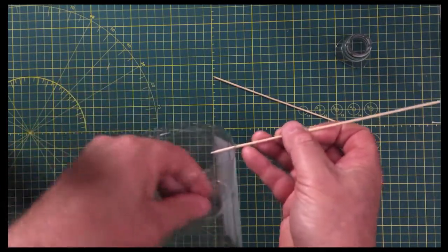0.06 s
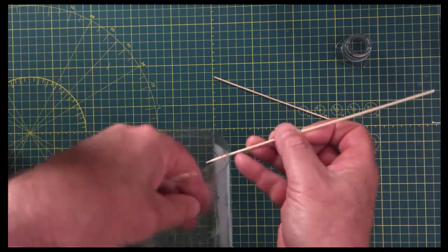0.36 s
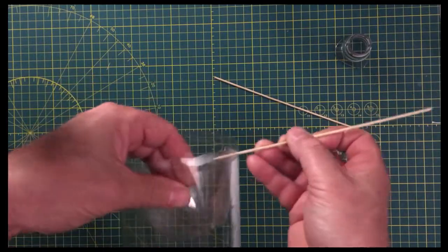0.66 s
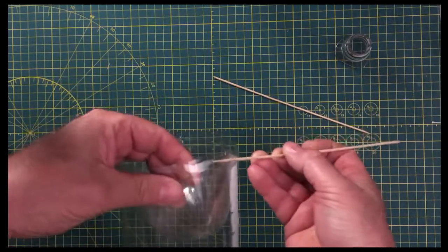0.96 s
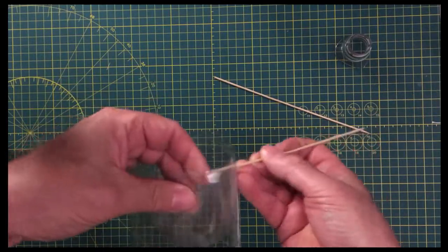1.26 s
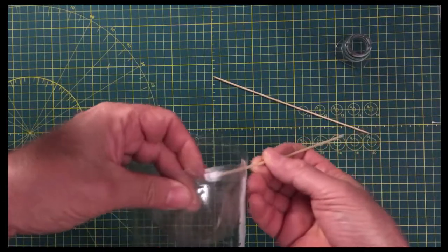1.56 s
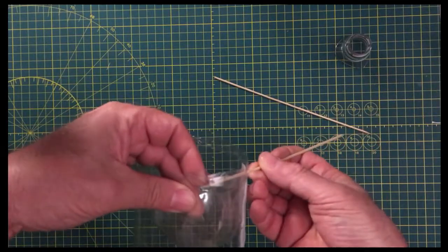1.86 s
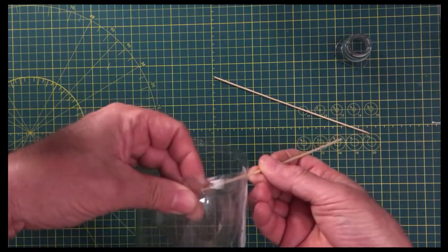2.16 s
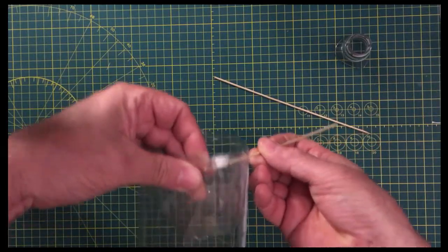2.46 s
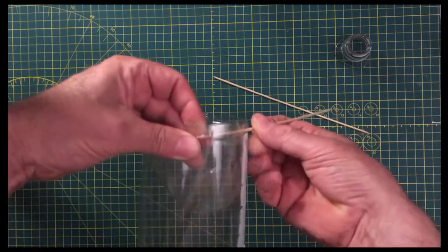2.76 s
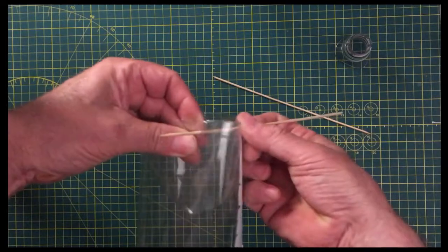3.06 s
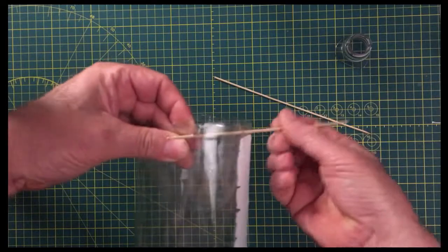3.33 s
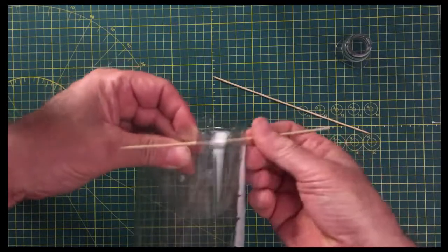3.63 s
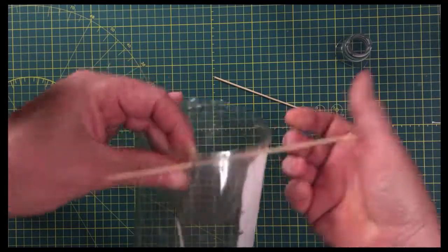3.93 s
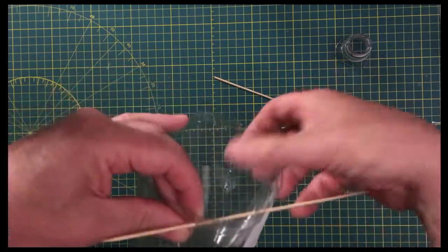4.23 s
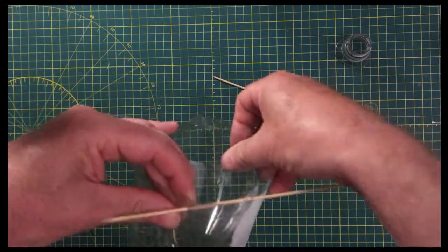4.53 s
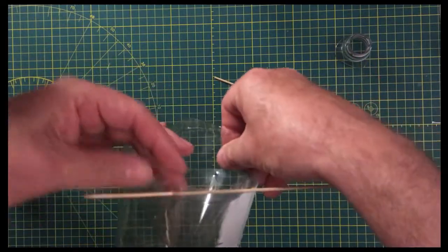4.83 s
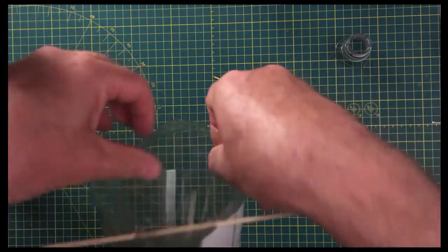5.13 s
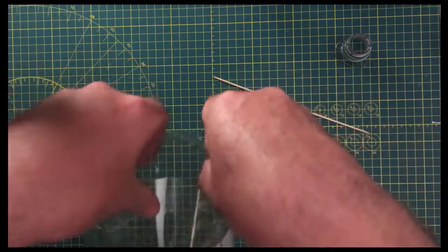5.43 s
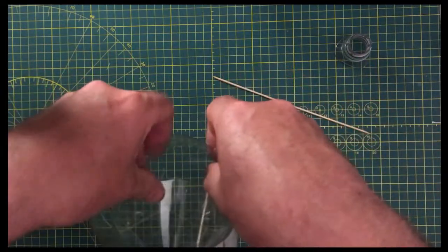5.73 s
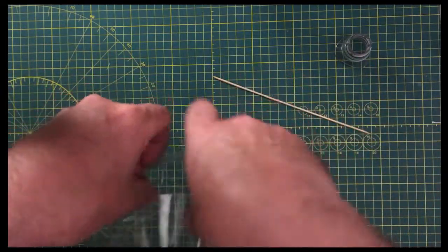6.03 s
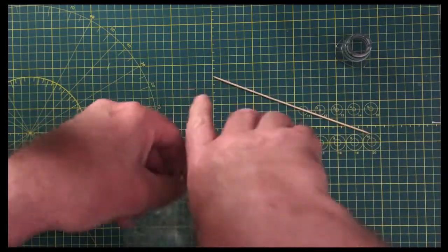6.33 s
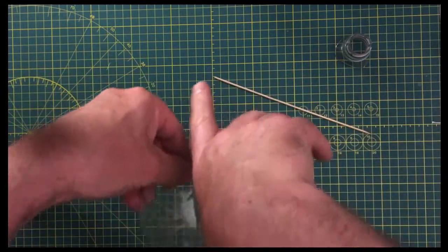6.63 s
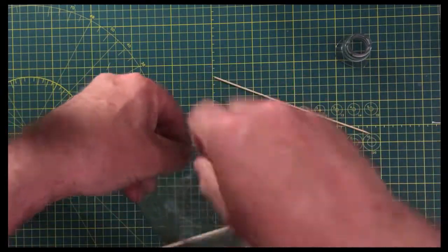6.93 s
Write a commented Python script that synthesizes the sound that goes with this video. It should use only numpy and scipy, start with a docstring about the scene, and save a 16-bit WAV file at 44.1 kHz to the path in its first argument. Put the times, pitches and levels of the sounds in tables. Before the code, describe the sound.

Wood ticks, rasps and squeaks in short turns against a thin plastic bottle until the wall gives way with a sharp snap, the loudest sound. A quick squeaky run follows as the stick slides through. Then come scattered plastic pops, short drags of the rim on the table and soft thuds of hands. Each touch rings hollow inside the bottle, heard from close by in a quiet small room.

```python
"""Skewer through a plastic bottle

Close up, a wooden skewer is twisted through a thin plastic bottle, then pushed on through it.
The wood rubs, ticks and squeaks in the tight hole, the far wall gives way with a loud snap, and the
shell pops under the fingers. The bottle's rim drags over a cutting mat; the air inside rings on
after every touch, and a small room answers."""
import sys
import numpy as np
from scipy import signal
from scipy.fft import rfft, irfft, next_fast_len
from scipy.io import wavfile
from scipy.ndimage import uniform_filter1d, map_coordinates

SR = 44100
rng = np.random.default_rng(int(sys.argv[2]) if len(sys.argv) > 2 else 0)


def transcribe(signal):
    """Save signal, clipped to [-1, 1], as a 16-bit WAV file at the path in sys.argv[1]."""
    frames = np.atleast_2d(signal).T
    limited = np.clip(frames, -1, 1)
    pcm = np.round(limited * 32767).astype(np.int16)
    wavfile.write(sys.argv[1], SR, pcm)


N = 308259

# Resonances, all as (pitch [Hz], width [Hz], level [dB])
WOOD_MODES = [(2160, 300, 2), (2630, 180, -3), (3430, 220, 0), (3804, 320, 3), (4430, 610, -1),
              (5740, 400, -12.5), (7060, 750, 0.5), (7580, 540, -6.5), (11240, 990, -7),
              (12900, 1700, -17.5)]  # the skewer's bright ring
WALL_MODES = [(693, 136, -13.5), (832, 150, -5.5), (1089, 78, 0.5), (1174, 51, -2), (1316, 120, -12)]  # the midrange honk of the bottle's wall
CAVITY_MODES = [(117, 130, -14), (259, 66.4, -4.5), (333.5, 34.8, 4), (430, 60, -13.5), (485, 160, -17.5),
                (622, 380, -14)]  # the hollow hum inside
SHELL_MODES = [(853, 38, -4.5), (1083, 237, 4), (2070, 270, -1.5), (2463, 290, -0.5), (3305, 840, -4.5),
               (4070, 410, -2), (4690, 610, -5.5), (5940, 700, -4.5), (7050, 1300, -5), (8600, 1900, -7),
               (11400, 3700, -14)]  # the crisp crackle of thin plastic


def amp(db):
    """Decibels to gain."""
    return 10 ** (np.asarray(db) / 20)


def unit(x):
    """Scale to rms 1."""
    return x / np.sqrt(np.mean(x ** 2) + 1e-20)


def unit_peak(x):
    """Scale a hit so that its loudest 3 ms peak at roughly 1."""
    power = np.abs(uniform_filter1d(x ** 2, size=128))
    return x / (2 * np.sqrt(power.max()))


def along(points, hz):
    """Read a curve of (frequency [Hz], value) points on a log axis."""
    f, values = np.transpose(points)
    return np.interp(np.log(hz + 1), np.log(f), values)


def add(track, s, x):
    """Mix x into track from time s."""
    start = max(round(s * SR), 0)
    part = track[start:start + len(x)]
    part += x[:len(part)]


def filtered(x, response):
    """Filter x by a complex response of frequency."""
    size = next_fast_len(len(x) + 4096)
    return irfft(rfft(x, size) * response(np.fft.rfftfreq(size, 1 / SR)), size)[:len(x)]


def ring(x, modes, vary=0, order=1):
    """Play x through resonances; vary recolours them per contact point, order 2 steepens them."""
    gains_db = 3 * vary * rng.normal(0, 1, len(modes))
    stretch = 1 + .02 * vary * rng.normal()

    def response(f):
        total = 0
        for k, (hz, width, db) in enumerate(modes):
            peak = 1j * f * width / ((hz * stretch) ** 2 - f * f + 1j * f * width)
            total += (-1) ** (k * order) * amp(db + gains_db[k]) * peak ** order
        return total
    return filtered(x, response)


def wobble(rate):
    """A smooth random curve with rate knots a second."""
    knots = rng.standard_normal(int(N * rate / SR) + 4)
    return map_coordinates(knots, [np.arange(N) * rate / SR])


def friction(rate, spread_db, rush):
    """Tiny slips of uneven size, rate a second, over a smooth rush."""
    clicks = (rng.random(N) < rate / SR) * rng.choice([-1, 1], N)
    sizes = amp(spread_db * np.clip(rng.standard_normal(N), -2, 2))
    return unit(clicks * sizes) + rush * rng.standard_normal(N)


def burst(rise_s, decay_s):
    """A short broadband shudder of force that swells and dies."""
    t = np.arange(4096) / SR
    envelope = (1 - np.exp(-(t / rise_s) ** 2)) * np.exp(-t / decay_s)
    spectrum = rfft(rng.standard_normal(len(t)) * envelope)
    return irfft(spectrum / (np.abs(spectrum) + 1e-9)) * np.sqrt(envelope)


def pressure(strokes, rise_s, fall_s):
    """Envelope of (time [s], length [s], level [dB]) strokes that bite, ease off and let go."""
    sag_db_per_s = 23.5
    power, t = np.zeros(N), np.arange(SR // 3) / SR
    bite = 1 - np.exp(-(t / rise_s) ** 2)
    for s, length, db in strokes:
        eased = amp(db - sag_db_per_s * (t - length / 2)) ** 2
        release = np.exp(-np.maximum(t - length, 0) / fall_s)
        add(power, s - rise_s / 2, eased * bite * release)
    return np.sqrt(power)


def room_tone():
    """The room's steady, dark hush."""
    # Noise colour: (frequency [Hz], level [dB])
    colour = [(15, -31.5), (25, -20), (217, -2.5), (463, -5), (575, -12.5), (754, -8), (1480, -15.5),
              (1610, -15), (4490, -31), (4870, -38.5), (16000, -56.5)]
    return unit(filtered(rng.standard_normal(N), lambda f: amp(along(colour, f))))


def room_reverb(x, build_s=.0018, sections=24):
    """A small room's short tail, longest in the lows, drawn afresh for each equal section."""
    # Reverb time: (frequency [Hz], time to fall 60 dB [s])
    decay_times = [(150, 0.37), (400, 0.44), (1000, 0.28), (2800, 0.31), (7300, 0.19), (15000, 0.21)]
    out = np.zeros(N)
    for part in np.array_split(np.arange(N), sections):
        hz, t, noise = signal.stft(rng.standard_normal(SR // 2), SR, nperseg=256)
        decay = amp(-60 * t / along(decay_times, hz)[:, None])
        tail = signal.istft(noise * decay, SR, nperseg=256)[1]
        tail *= 1 - np.exp(-(np.arange(len(tail)) / SR / build_s) ** 2)
        send = x[part] * signal.windows.tukey(len(part), .02)
        add(out, part[0] / SR, signal.fftconvolve(send, tail / np.linalg.norm(tail)))
    return out


def bottle_air(touch, width_hz=24):
    """The air inside the bottle rings on after every touch."""
    # Narrow air resonances: (pitch [Hz], level [dB])
    modes = [(637, -7.5), (1053, -2), (1274, -6), (1514, 1.5), (2005, -8.5), (2396, -10.5), (2612, -5),
             (3173, -4), (3910, -7.5), (4555, -4), (7052, -9.5)]
    return filtered(touch, lambda f: sum(amp(db) / (1 + 2j * (f - hz) / width_hz) for hz, db in modes))


def finger_grip(ticks_per_s=4, tick_hz=9000):
    """Skin creeps on the shell, the cavity hums along, and a firmer grip makes louder ticks."""
    # Firmness of the grip: (time [s], level [dB])
    firmness = [(0, -51), (0.9, -62), (2.35, -71), (2.7, -64), (3.348, -60), (4.3, -65), (4.85, -52.5),
                (5.7, -64.5), (5.85, -56.5), (6.15, -64), (6.99, -60.5)]
    grip_db = lambda s: np.interp(s, *np.transpose(firmness))
    creep = amp(5.5 * wobble(25)) * unit(ring(friction(1800, 2.8, .63), SHELL_MODES))
    hum = amp(3.5 + 5.3 * wobble(18)) * unit(ring(friction(900, 3.2, .32), CAVITY_MODES))
    draws = rng.random((round(ticks_per_s * N / SR), 2)) * [N / SR, 1]
    ticks = [(s, grip_db(s) + 11 + 4 * force, tick_hz) for s, force in draws]
    skin = amp(grip_db(np.arange(N) / SR) - 4.5) * (creep + hum)
    return skin + amp(-2) * buckle(ticks, decay_s=.004)


def rim_slides():
    """The rim chatters over the mat and sings in its narrow resonances, swelling with its speed."""
    # Drags: (time [s], rise [s], hold [s], fall [s], level [dB], strongest note [Hz])
    drags = [(0.549, 0.046, 0.073, .028, -38.5, 871), (3.87, 0.14, 0.013, 0.07, -30, 773),
             (4.638, 0.0043, 0.08, 0.0073, -30.5, 885), (6.255, 0.017, 0.0065, 0.036, -26.5, 1077),
             (6.359, .017, .012, .017, -26, 1083)]
    # The rim's low and high resonances: (pitch [Hz], width [Hz], level [dB])
    low_modes = [(530, 120, -4), (793, 122, -1.5), (876, 82, 1.5), (1053, 100, -2), (1325, 71, -2.5),
                 (1496, 56, -4.5)]
    high_modes = [(1907, 88, 4.5), (2220, 100, 4.5), (2580, 240, -4.5), (3206, 56, 6.5), (3480, 230, -2.5),
                  (4430, 780, -4), (7100, 490, -8.5), (8000, 950, -14.5), (12500, 2100, -22.5)]
    out, t = np.zeros(N), np.arange(SR // 2) / SR
    chatter = friction(2500, 3.7, .19) * amp(1.5 * wobble(90))
    for s, rise, hold, fall, db, hz in drags:
        speed = np.minimum(t / rise, 1) * np.exp(-(np.maximum(t - rise - hold, 0) / fall) ** 1.1)
        low_cut_hz = .65 * hz
        drag = filtered(chatter[round(s * SR):][:len(t)], lambda f: 1 - 1 / (1 + (f / low_cut_hz) ** 8))
        note = amp(-7.5) * unit(ring(drag, [(hz, .046 * hz, 0)], order=2))
        body = amp(-4.5) * unit(ring(drag, low_modes))
        edge = amp(-6.5) * unit(ring(drag, high_modes))
        add(out, s, amp(db) * speed * (body + edge + note))
    return out


def dull_thuds():
    """Dull, damped thuds: hands bumping the bottle, and the wall buckling just before the snap."""
    # Thuds: (time [s], level [dB], pitch [Hz])
    thuds = [(2.592, -20.5, 210), (3.0201, -11, 515), (3.519, -32, 281), (3.544, -34.5, 120),
             (4.827, -33, 110), (5.038, -30.5, 140), (6.561, -19, 183), (6.597, -31, 260)]
    out = np.zeros(N)
    for s, db, hz in thuds:
        thud = ring(burst(.0023, .007), [(hz, 1.2 * hz, 0)])
        muffled = ring(thud, [(hz, 1.5 * hz, 0)])
        add(out, s, amp(db) * unit_peak(muffled))
    return out


def rubbing():
    """Wood and skin rub the bottle: the cavity hums, the wall rasps and the contact hisses."""
    # Skewer turns and finger strokes: (time [s], length [s], hum level [dB], rasp level [dB])
    rubs = [(0, .012, -45.5, -35.5), (0.071, 0.03, -43, -45.5), (.185, 0.017, -41.5, -40),
            (0.226, .022, -37.5, -34.5), (0.426, 0.03, -34.5, -44), (0.698, 0.082, -42, -53.5),
            (1.216, 0.1, -33.5, -43), (1.491, 0.037, -42.5, -56), (1.627, 0.059, -31, -45.5),
            (1.849, 0.039, -42, -53), (2.58, 0.03, -34.5, -42.5), (2.96, 0.08, -32, -45.5),
            (3.121, 0.16, -43, -50), (3.239, 0.024, -33.5, -45), (3.424, 0.076, -46, -49),
            (3.513, .032, -25.5, -41.5), (3.557, 0.058, -29.5, -39.5), (3.753, 0.024, -38.5, -50.5),
            (3.827, .21, -42, -50), (4.373, 0.045, -40.5, -47), (4.445, 0.024, -40.5, -45.5),
            (4.774, 0.12, -42, -49), (4.889, .028, -43.5, -41.5), (4.983, 0.048, -33, -36.5),
            (5.119, 0.031, -42, -35), (5.368, .066, -46.5, -41), (5.525, 0.021, -43, -47),
            (5.785, .04, -57, -53.5), (5.846, .056, -48.5, -50.5), (6.382, 0.028, -36.5, -37),
            (6.752, 0.034, -41.5, -43.5), (6.955, .04, -42, -40)]
    # Dry swishes, and the short scuff as the bottle starts to slide: (time [s], length [s], level [dB])
    swishes = [(2.535, 0.044, -42.5), (3.06, 0.085, -40), (4.642, 0.0055, -32)]
    # The skewer running through its holes: (time [s], length [s], level [dB])
    runs = [(3.043, .05, -31), (3.882, 0.13, -38), (4.02, 0.12, -44.5), (4.997, 0.021, -30)]
    # Colour of the contact's hiss: (frequency [Hz], level [dB])
    grit_colour = [(1000, -35), (1600, -2), (2100, 5), (2700, 3.5), (3100, -0.5), (3600, 3), (5000, -2.5),
                   (8500, -6), (12000, -13.5), (16000, -29)]
    hums, rasps = np.array(rubs)[:, :3], np.array(rubs)[:, [0, 1, 3]]
    judder = amp(1.3 * wobble(110))
    cavity = unit(ring(friction(900, 5.2, .48), CAVITY_MODES))
    wall = unit(judder * ring(friction(700, 4, .61), WALL_MODES))
    flutter = judder * amp(2 * wobble(60))
    grit = unit(flutter * filtered(friction(1000, 5.5, .78), lambda f: amp(along(grit_colour, f))))
    swish = unit(ring(friction(3000, 3.3, .65), SHELL_MODES, order=2))
    wood = unit(amp(6.3 * wobble(170)) * ring(friction(2000, 4.6, .36), WOOD_MODES, order=2))
    return (amp(-1.5) * cavity * pressure(hums, .0049, .0087)
            + amp(-1) * wall * pressure(rasps, .004, .0026)
            + amp(-1.5) * grit * pressure(rasps, .005, .0023)
            + amp(-4.5) * swish * pressure(swishes, .003, .0025)
            + amp(-4) * wood * pressure(runs, .009, .0091))


def stutter(start_s=3.8337, gap_s=.0155, count=11):
    """Pushed on, the skewer slips in a quick, near-even run: (time [s], level [dB], squeak [Hz])."""
    k = np.arange(count)
    late, louder = rng.standard_normal((count, 2)).T
    times = start_s + gap_s * k + .0007 * late
    ease_db = 4 * np.sin(np.pi * k / count) ** 6  # it slides most freely halfway
    squeak_hz = np.where(k < 3, 7180, 3880)  # the squeak drops once it is moving
    return list(zip(times, -23 - ease_db + 1.5 * louder, squeak_hz))


def skewer_ticks():
    """A slip rings the wood, one squeak above all, and tugs the wall; a prod rings mostly the wall."""
    # Stick and slip in the tight hole: (time [s], level [dB], squeak [Hz])
    slips = [(0.2384, -9, 3374), (1.2174, -27, 3900), (1.4275, -19, 3890), (1.465, -27, 3910),
             (2.6356, -31, 3870), (2.646, -30, 3850), (2.6664, -24.5, 7300), (2.703, -21.5, 3900),
             (2.7917, -17.5, 2110), (4.643, -27, 7440), (5.0752, -10.5, 3690), (5.0985, -10, 7000),
             (5.1223, -15, 4400), (5.1328, -19, 3400), (6.261, -17, 6830), (6.2753, -19, 4900)]
    # The point prodding the wall: (time [s], level [dB])
    prods = [(.191, -22.5), (0.4342, -23.5), (.469, -23), (.497, -18.5), (1.218, -27.5), (1.252, -27),
             (2.21, -37.5), (2.918, -34.5), (3.811, -20.5)]
    tug_db, tug_growth = -16, .53  # a harder slip tugs the wall harder
    prod_wood_db, prod_hz = -11.5, 3480
    contacts = [(s, db, hz, tug_db + tug_growth * db) for s, db, hz in slips + stutter()]
    contacts += [(s, db + prod_wood_db, prod_hz, db) for s, db in prods]
    out = np.zeros(N)
    for s, wood_db, hz, wall_db in contacts:
        wood = unit_peak(ring(burst(.0022, .0022), WOOD_MODES, vary=.75, order=2))
        squeak = unit_peak(ring(burst(.0015, .0015), [(hz, .05 * hz, 0)], order=2))
        wall = unit_peak(ring(burst(.0012, .0032), WALL_MODES, vary=.66))
        cavity = unit_peak(ring(burst(.002, .0019), CAVITY_MODES))
        tick = amp(-3) * wood + amp(-7) * squeak
        tug = amp(-3) * wall + amp(-9) * cavity
        add(out, s - .0012, amp(wood_db) * tick + amp(wall_db) * tug)
    return out


def buckle(hits, decay_s, vary=.82):
    """A patch of shell flips: a crack through its modes and a puff in the cavity."""
    out = np.zeros(N)
    for s, db, brightness_hz in hits:
        crack = ring(burst(.0005, decay_s), SHELL_MODES, vary=vary, order=2)
        crack = filtered(crack, lambda f: 1 / (1 + 1j * f / (2 * brightness_hz)) ** 2)
        puff = ring(burst(.0012, .001), CAVITY_MODES, vary=.35)
        # A large patch sounds duller and moves more air.
        puff_db = -15 + .64 * db - 7.5 * np.log2(brightness_hz / 3000)
        add(out, s - .0006, amp(db) * unit_peak(crack) + amp(puff_db) * unit_peak(puff))
    return out


def shell_pops():
    """The thin shell pops as it buckles or is knocked."""
    # Pops: (time [s], level [dB], brightness [Hz])
    pops = [(1.055, -41.5, 6000), (1.42, -27, 3000), (1.629, -37.5, 4000), (1.859, -31.5, 2970),
            (2.024, -29, 3900), (2.416, -36, 2500), (2.4335, -22, 1280), (2.842, -24, 2140),
            (3.0215, -8, 2100), (3.6195, -14, 1900), (3.769, -38.5, 5000), (4.295, -44, 6000),
            (4.788, -36, 9000), (4.9565, -19.5, 16000), (5.04, -32, 9000), (5.143, -17.5, 2620),
            (5.264, -32.5, 2530), (5.295, -38, 8000), (5.461, -24.5, 5000), (5.489, -20, 2450),
            (5.526, -26, 2020), (5.545, -30.5, 3500), (5.655, -42.5, 8000), (5.847, -25, 4040),
            (5.895, -30.5, 2560), (5.962, -35, 1800), (6.108, -41.5, 8000), (6.22, -36.5, 6020),
            (6.238, -12.5, 8000), (6.2625, -12, 6240), (6.461, -29.5, 5970), (6.5235, -12, 6000),
            (6.756, -24.5, 3500)]
    return amp(-3) * buckle(pops, decay_s=.006)


def puncture():
    """One loud snap: the point breaks through, the wall rebounds and the skewer shoots on."""
    # The snap's three cracks: (time [s], level [dB], brightness [Hz])
    cracks = [(3.039, -0.5, 8200), (3.0413, -3.5, 5040), (3.0443, -14.5, 750)]
    return amp(-2.5) * buckle(cracks, decay_s=.0033, vary=.3)


def scene():
    """Every touch rings the air in the bottle; the room answers over its quiet tone."""
    touch = (rubbing() + skewer_ticks() + shell_pops() + puncture()
             + dull_thuds() + rim_slides() + finger_grip())
    bottle = touch + amp(-6) * bottle_air(touch)
    hush = amp(-57) * room_tone()
    reverb = amp(-10.5) * room_reverb(bottle)
    return (amp(-.82) * (bottle + reverb) + hush)[None]


def record(dry):
    """Soft clipping rounds the highest peaks, then a steep low-pass trims the top."""
    ceiling, top_hz = .75, 16100
    rounded = dry[0] / (1 + (dry[0] / ceiling) ** 4) ** (1 / 4)
    return filtered(rounded, lambda f: 1 / (1 + (f / top_hz) ** 120))[None]


dry = scene()
out = record(dry)
transcribe(out)
```